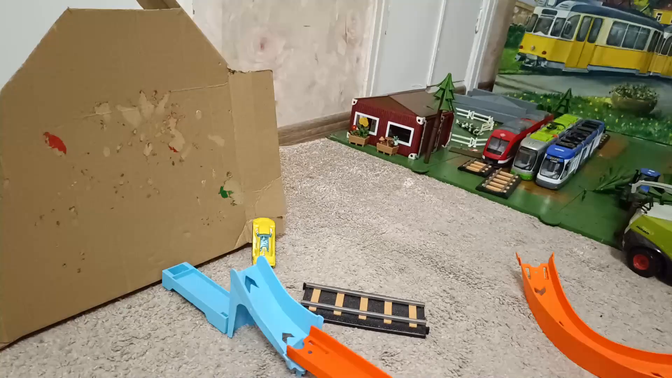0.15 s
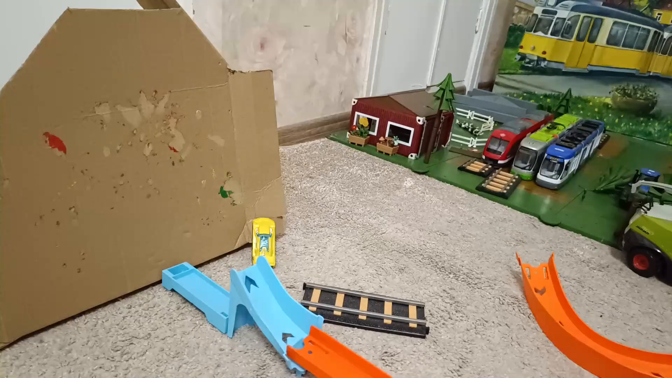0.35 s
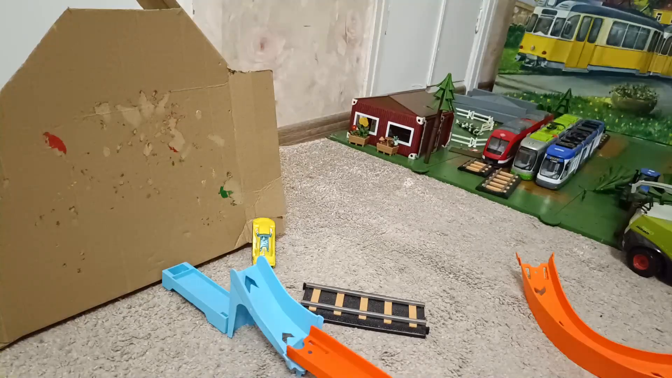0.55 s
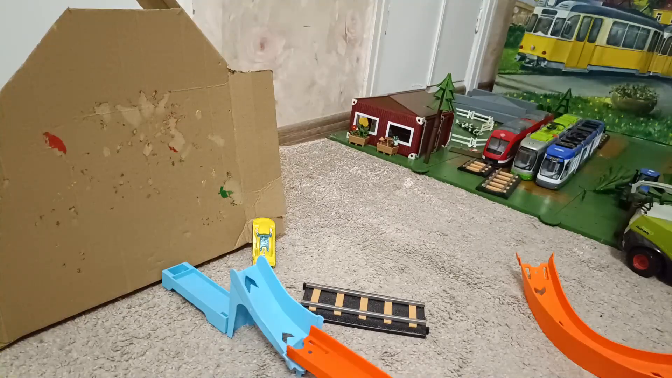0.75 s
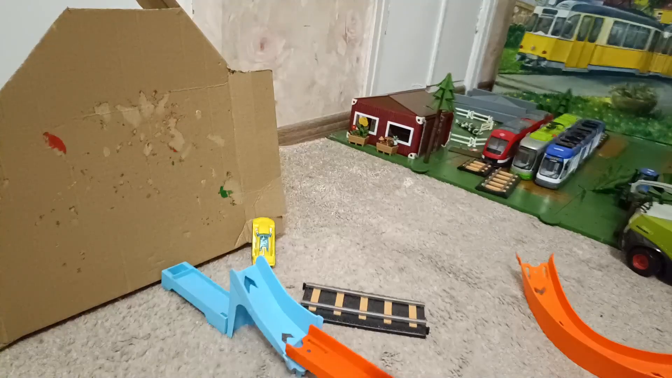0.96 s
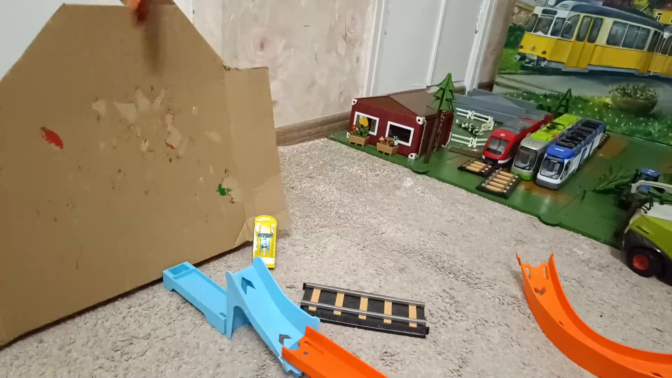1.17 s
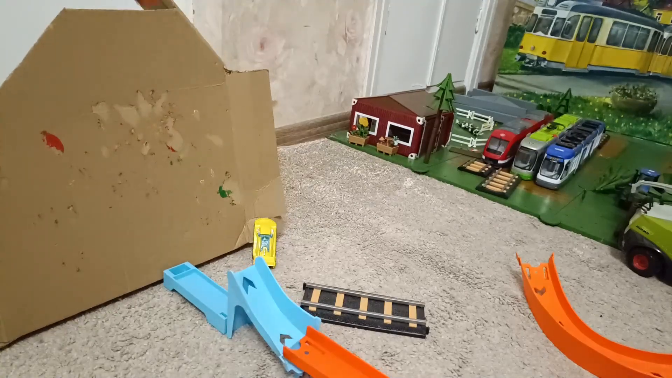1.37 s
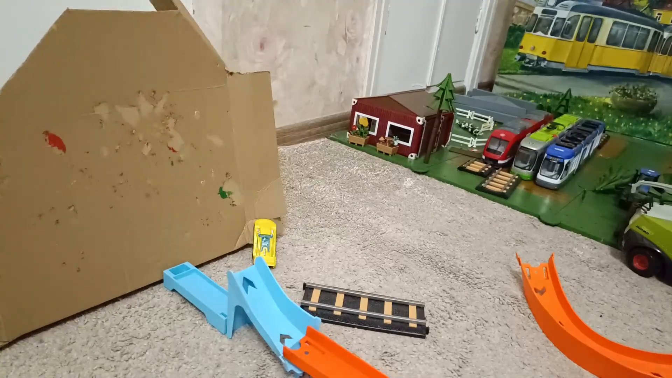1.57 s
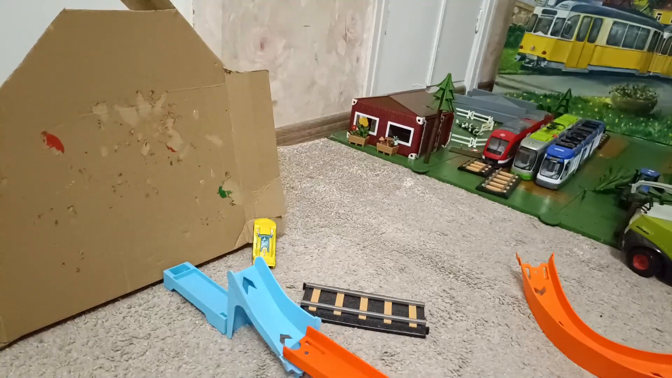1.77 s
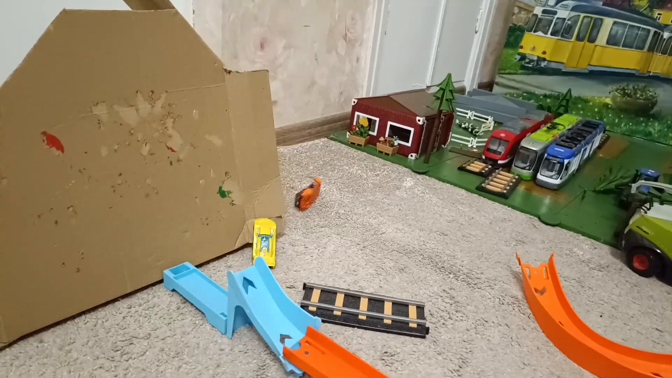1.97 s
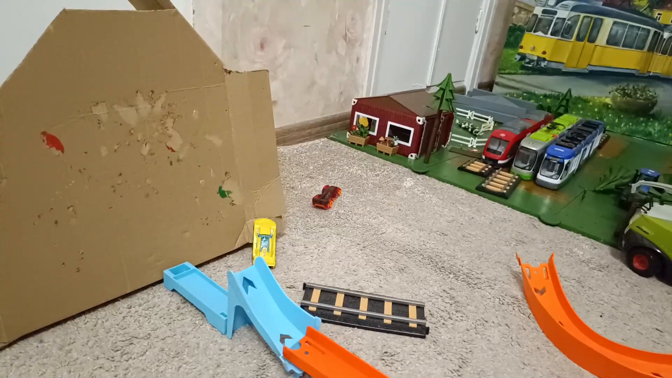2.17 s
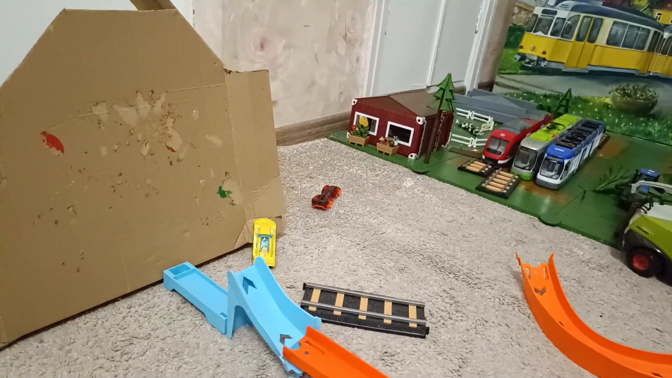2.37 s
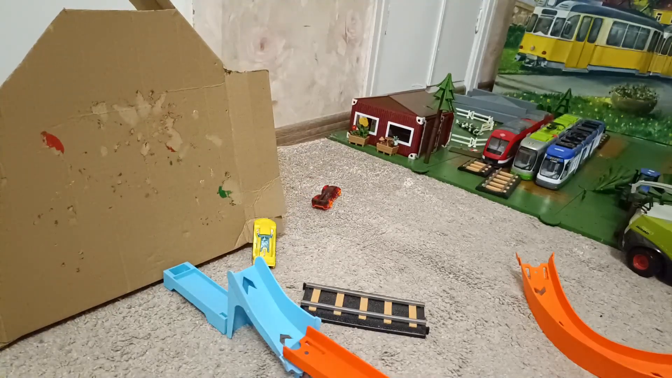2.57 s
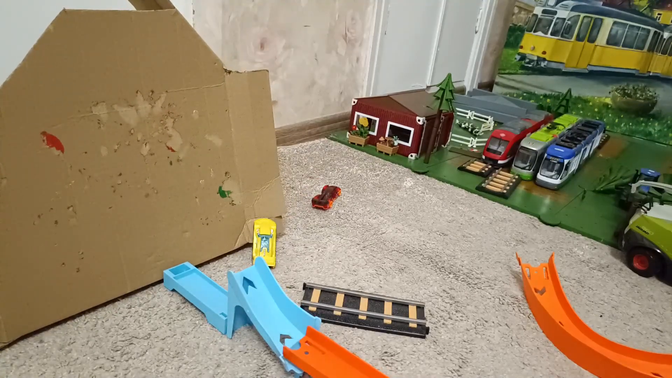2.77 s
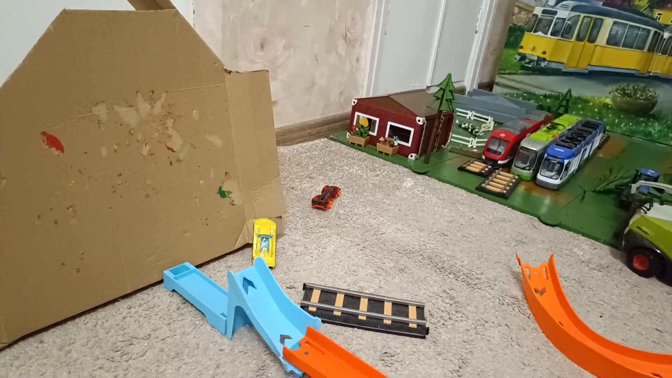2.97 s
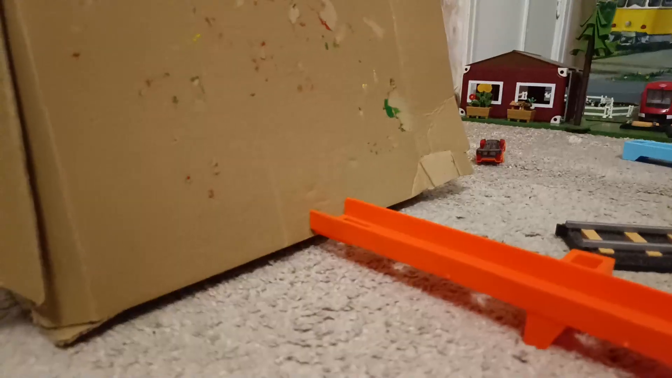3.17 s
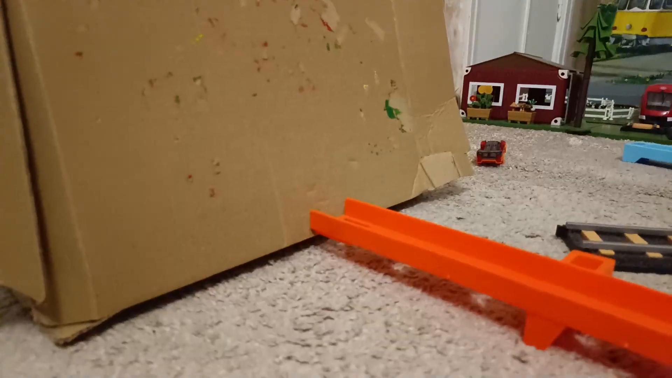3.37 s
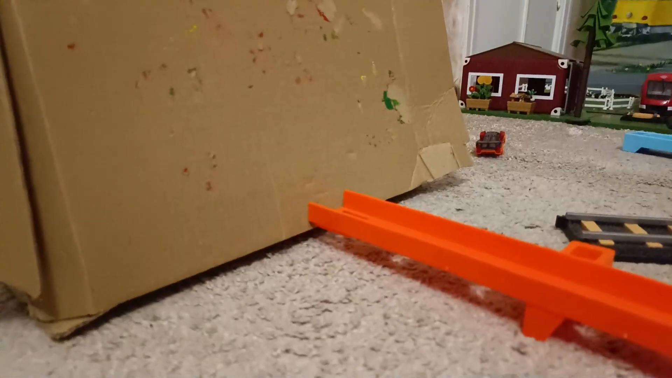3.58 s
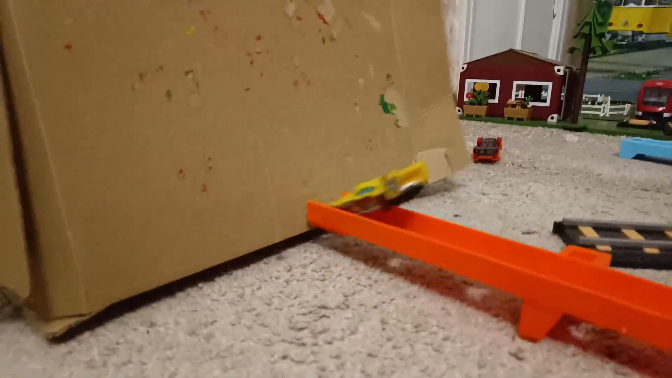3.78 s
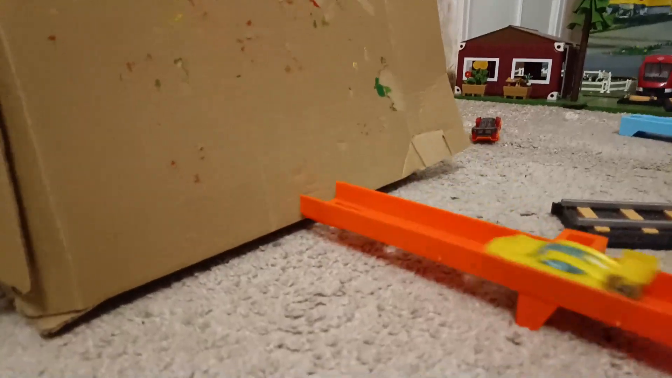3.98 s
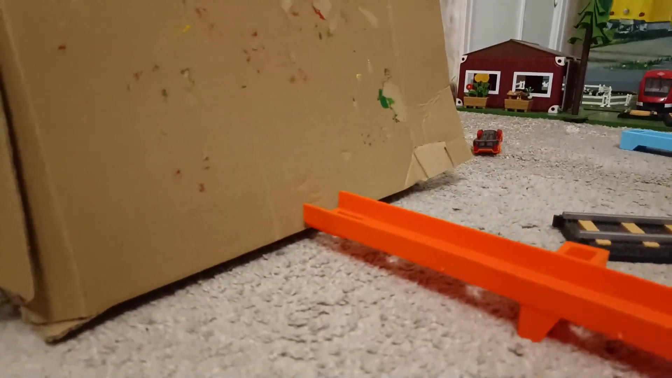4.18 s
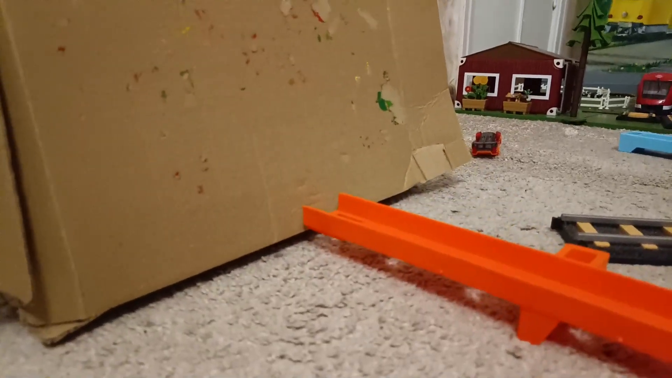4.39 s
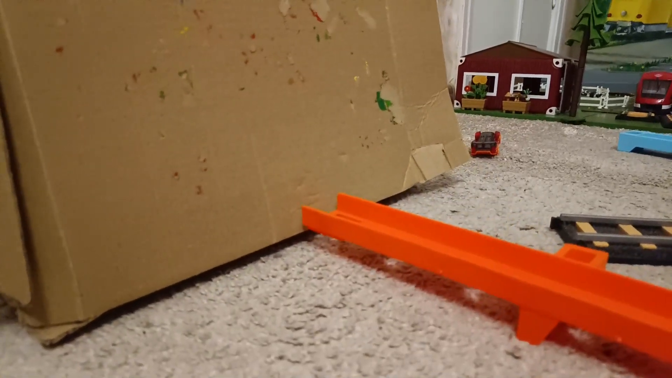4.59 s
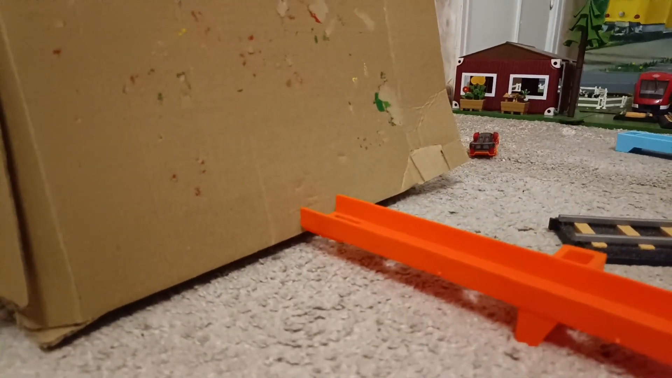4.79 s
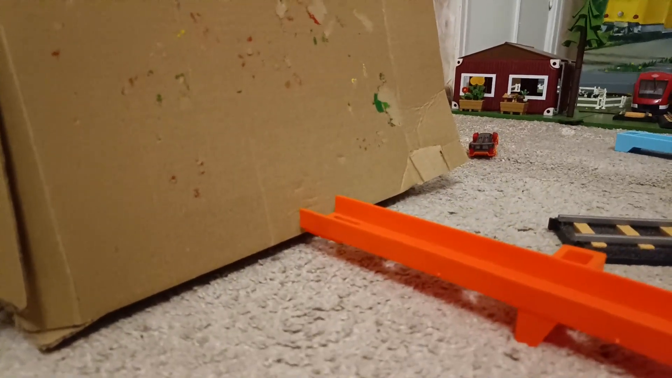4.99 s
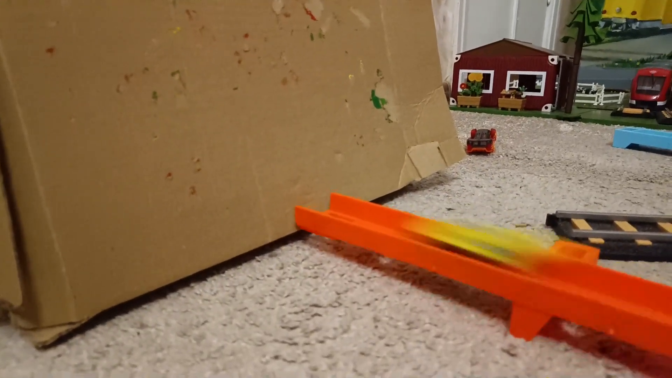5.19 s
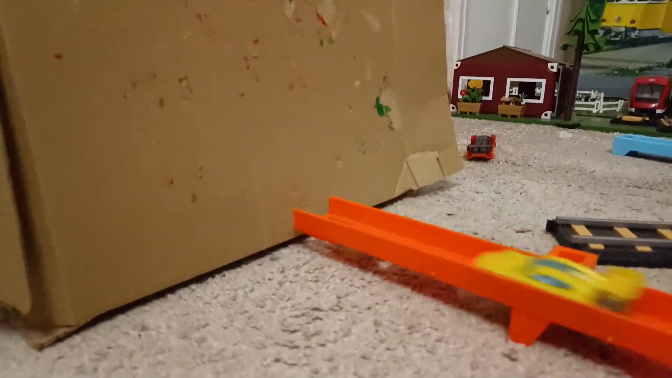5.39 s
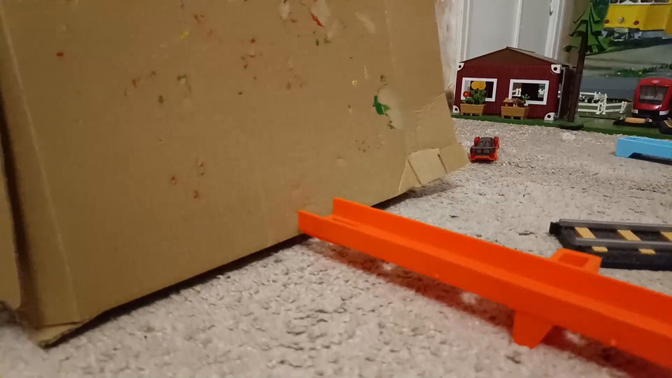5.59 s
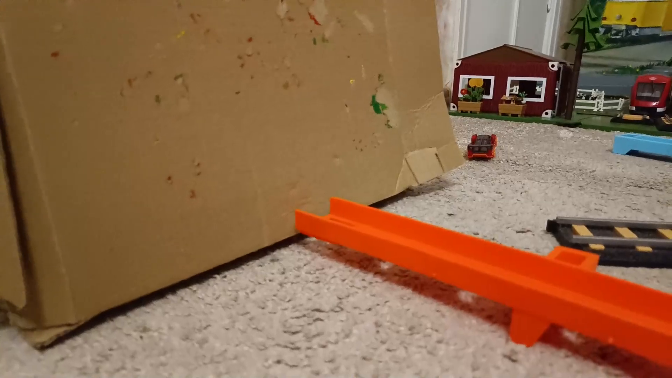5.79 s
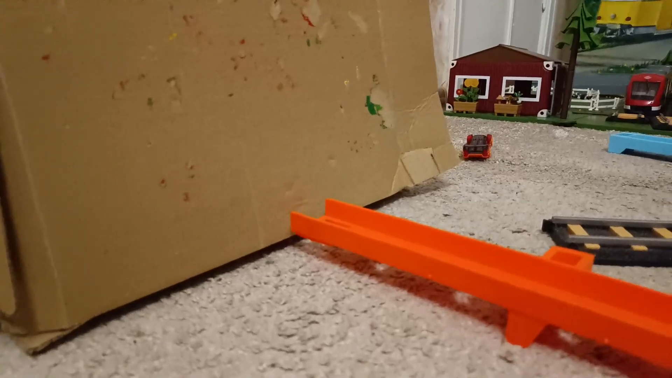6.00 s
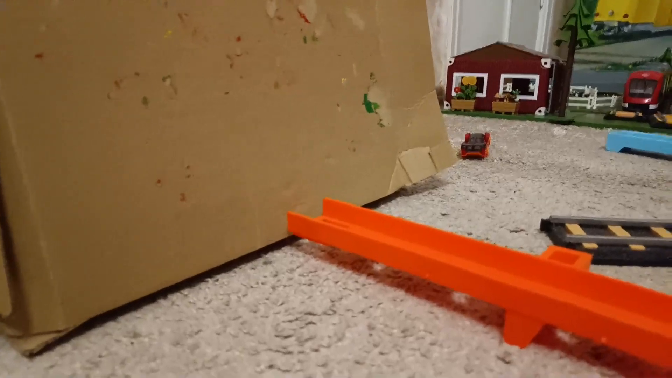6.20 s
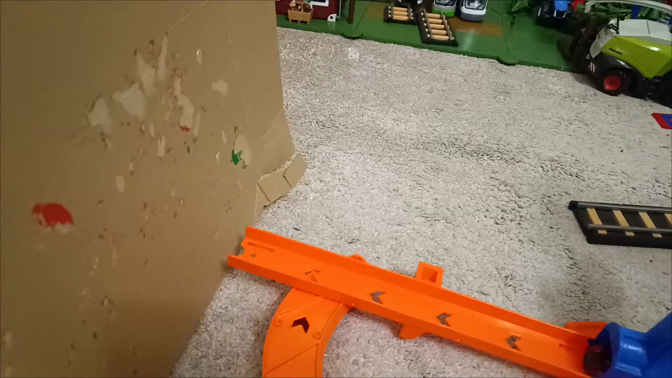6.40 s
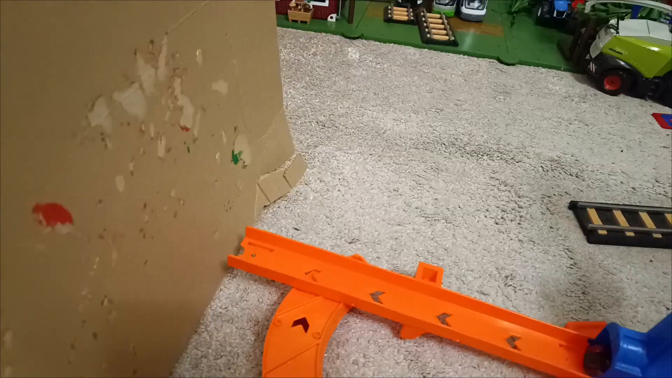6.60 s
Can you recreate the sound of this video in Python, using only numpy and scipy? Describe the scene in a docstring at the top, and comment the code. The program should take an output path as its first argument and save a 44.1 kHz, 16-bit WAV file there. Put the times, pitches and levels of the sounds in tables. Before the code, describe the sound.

Three toy metal cars shoot from a clacking plastic launcher, rattle along track and thump a cardboard box, wheels whirring in a quiet carpeted room.

```python
"""An appliance hums under room air and a thin whine; then a toy launcher clacks, close by on the right.
Three die-cast cars in turn clatter along a plastic track and thump a cardboard box in a carpeted room.
The first jumps off a ramp, tumbles and lands on the carpet, wheels spinning; the next two roll back.
Blows are bursts of noise bands that die away, the box panel adds sine modes, wheels are grainy noise,
and the hum and whine are drifting sines; two microphone channels hear it all with short reflections."""
import sys
import numpy as np
from scipy import signal
from scipy.io import wavfile

SR = 44100
rng = np.random.default_rng(int(sys.argv[2]) if len(sys.argv) > 2 else 0)


def master_out(mix):
    """Clip the mix to full scale and print it as 16-bit PCM to the path in sys.argv[1]."""
    frames = np.transpose(np.atleast_2d(mix))
    ceiling = np.clip(frames, -1, 1)
    pcm = np.round(ceiling * 32767).astype(np.int16)
    wavfile.write(sys.argv[1], SR, pcm)


N = 293265
TIME = np.arange(N) / SR   # s
EDGES = np.geomspace(35, 17500, 28)   # third-octave band edges, Hz
CENTRES = np.sqrt(EDGES[1:] * EDGES[:-1])   # Hz

# the plunger slams into its stop and rebounds: (t/s, rebound gap/s, level/dB,
# brightness/dB per octave, brightening per rebound/dB per octave)
SHOTS = [(0.8147, 0.0066, -8, -4.5, 5), (3.5213, 0.0091, -8, -1, 1.5), (5.0011, .0073, -9, 0.5, 1)]
# even-speed rolls, place 0 at the box and 1 at the launcher:
# (start t/s, end t/s, level at the box/dB, from place, to place)
ROLLS = [(0.848, 0.969, -41, 0.88, 0.099), (3.539, 3.606, -54, 0.81, 0.043), (3.76, 4.12, -57.5, 0.078, .9),
         (4.128, 4.238, -53.5, .9, 0.92), (5.021, 5.079, -49.5, 1, 0.035), (5.17, 5.434, -57.5, 0, 0.98),
         (5.563, 5.62, -52, 0.73, 0.44), (5.698, 5.768, -74.5, 1, 0.46)]


def from_db(db):
    """Decibels to gain."""
    return 10 ** (np.asarray(db) / 20)


def unit_energy(x):
    """Scale each row to energy 1."""
    return x / np.sqrt(np.sum(x ** 2, axis=-1, keepdims=True) + 1e-20)


def per_band(points):
    """Read a table over frequency at the band centres."""
    hz, value = np.transpose(points)
    return np.interp(np.log(CENTRES), np.log(hz), value)


def band_gains(colour, tilt_db=0):
    """Share a unit of energy among the bands; the tilt pivots at 1 kHz."""
    density_db = per_band(colour) + tilt_db * np.log2(CENTRES / 1000)
    return unit_energy(from_db(density_db) * np.sqrt(np.diff(EDGES)))


def noise_bands(size):
    """Third-octave stereo noise, channel x band x sample; likeness sets the mix of mid and side."""
    # likeness of diffuse sound at the two microphones: (f/Hz, correlation)
    likeness = [(50, 0.24), (250, 0.77), (500, 0.81), (1000, -0.39), (2000, -0.061), (16000, -0.36)]
    white = rng.standard_normal((2, 2, size + SR // 4))   # the extra start lets the filters settle
    bands = []
    for k, alike in enumerate(np.clip(per_band(likeness), -1, 1)):
        band_pass = signal.butter(2, EDGES[k:k + 2], "band", fs=SR, output="sos")
        mid, side = signal.sosfilt(band_pass, white[k % 2])[:, -size:]
        bands.append(np.sqrt(1 + alike) * mid + np.sqrt(1 - alike) * side * [[1], [-1]])
    return np.stack(bands, axis=1)


def dying(t60, size):
    """One exponential decay a band, down 60 dB after t60 seconds."""
    return np.exp(-np.log(1000) * TIME[:size] / np.maximum(t60, 1e-3)[:, None])


def add(out, sound, s, delay_ms, pan_db):
    """Lay a sound in at time s; it reaches the left microphone later by delay_ms and louder by pan_db."""
    for channel, side in enumerate((.5, -.5)):
        at = round((s + side * delay_ms / 1000) * SR)
        out[channel, at:at + sound.shape[-1]] += from_db(side * pan_db) * sound[channel]


def resonate(x, peaks):
    """Lift a narrow band around each resonance."""
    for hz, width_hz, lift_db in peaks:
        peak = signal.lfilter(*signal.iirpeak(hz, hz / width_hz, fs=SR), x)
        x = x + (from_db(lift_db) - 1) * peak
    return x


def knocks(rows, colour, t60, shortening, scatter, chatter_db, chatter_t60):
    """Noise bands stand for crowded modes, high ones dying first; loose parts chatter, faces scatter."""
    out, size = np.zeros((2, N)), SR // 10
    bank = noise_bands(size=SR)
    decay = dying(t60 * (CENTRES / 1000) ** -shortening, size)   # t60 holds at 1 kHz
    treble = CENTRES / (CENTRES + 1000)   # small things answer short waves only
    chatter = from_db(chatter_db) * treble[:, None] * dying(np.array([chatter_t60]), size)
    for s, level_db, tilt_db, delay_ms, pan_db in rows:
        a, b = rng.integers(0, SR - size, 2)
        jolt_sizes = np.minimum(rng.exponential(1, size=50), 2)
        jolts = np.interp(TIME[:size], np.linspace(0, TIME[size], 50), jolt_sizes)
        envelope = decay + chatter * jolts
        gains = band_gains(colour, tilt_db)
        direct = gains @ unit_energy(bank[0, :, a:a + size] * envelope)
        scattered = (gains * scatter * treble) @ unit_energy(bank[:, :, b:b + size] * envelope)
        blow = unit_energy(direct + scattered) * np.sqrt(.005 * SR)   # the energy of 5 ms at level 1
        add(out, from_db(level_db) * blow, s, delay_ms, pan_db)
    return out


def rebounding(rows, gap_s, loss_db):
    """One end of the struck thing touches first, the other a moment later and softer."""
    return [(s + k * gap_s, db - k * loss_db, tilt) for s, db, tilt in rows for k in (0, 1)]


def background(bands, waver_hz=4, waver=0.13):
    """Soft room air, an appliance hum wavering in level and phase, and a thin whine drifting in phase."""
    # the background as the microphone is carried about: (t/s, air level/dB, whine level/dB)
    levels = [(0, -62.5, -73.5), (.8, -57.5, -71.5), (2.2, -62.5, -76), (3.38, -62.5, -77),
              (3.499, -62, -84), (5.949, -62, -84.5)]
    # room air: (f/Hz, level/dB per Hz)
    air_colour = [(30, -12.5), (60, -16), (120, -0.5), (200, -0.5), (290, 4.5), (400, -8), (800, -11),
                  (2000, -13), (4000, -20.5), (7300, -29), (9000, -31), (11000, -26.5), (16000, -27.5)]
    hum_hz, hum_db, whine_hz = 264, -69, 1916
    s, air_db, whine_db = np.transpose(levels)
    air_noise = np.roll(band_gains(air_colour) @ bands, N // 2, axis=1)   # apart from the other noises
    air = from_db(np.interp(TIME, s, air_db)) * air_noise
    low_pass = signal.butter(2, waver_hz, fs=SR, output="sos")
    slow = signal.sosfilt(low_pass, rng.standard_normal((3, N)))
    swell, hum_drift, whine_drift = waver * unit_energy(slow) * np.sqrt(N)
    hum = from_db(hum_db) * (1 + swell) * np.sin(2 * np.pi * hum_hz * TIME + hum_drift)
    whine_gain = from_db(np.interp(TIME, s, whine_db))
    whine = whine_gain * np.sin(2 * np.pi * whine_hz * TIME + whine_drift)
    return air + np.sqrt(2) * (hum + whine)   # sine levels are RMS


def handling(bands):
    """Brief soft swells of rubbing noise."""
    # faint handling rustles between the shots: (t/s, level/dB, length/s)
    rustles = [(0.177, -61.5, 0.024), (2.821, -57.5, 0.023), (3.385, -58.5, 0.058), (4.367, -67, 0.053),
               (4.632, -56.5, 0.031)]
    # colour of the rubbing: (f/Hz, level/dB per Hz)
    rub_colour = [(200, 0), (1200, -7), (2500, -4), (4800, -8.5), (7000, -20), (16000, -25)]
    swells = sum(from_db(level_db) * np.exp(-2 * ((TIME - s) / length) ** 2)
                 for s, level_db, length in rustles)
    return swells * (band_gains(rub_colour) @ bands)


def shot_blows(count=3):
    """The catch ticks, then the plunger strikes its stop, weaker and brighter, the spring rattling between."""
    latch_lead_s, latch_db, latch_tilt_db = 0.0035, -14, 1   # the catch lets go just before the slam
    spring_db, spring_tilt_db = -11.5, 4.5   # the spring rattles between the rebounds
    loss_db = 3.5   # lost on each rebound
    rows = []
    for s, gap, db, tilt, brightening in SHOTS:
        rows.append((s - latch_lead_s, db + latch_db, latch_tilt_db))
        rows += [(s + k * gap, db - k * loss_db, tilt + k * brightening) for k in range(count)]
        rows += [(s + (k + .5) * gap, db + spring_db - k * loss_db, spring_tilt_db)
                 for k in range(count - 1)]
    return rows


def car_place():
    """Where the car is, 0 at the box and 1 at the launcher; each roll's end place holds until the next."""
    place = np.ones(N)
    for start, end, level_db, origin, goal in ROLLS:
        place = np.where(TIME < start, place, np.interp(TIME, [start, end], [origin, goal]))
    return np.clip(place, 0, 1)


def car_delay_ms():
    """The left-microphone delay follows the car along the track."""
    box_ms, launcher_ms = -0.26, .43
    return box_ms + (launcher_ms - box_ms) * car_place()


def gate(start, end):
    """Wheel sound builds up exponentially, holds, and runs out."""
    attack_s, release_s = 0.0087, 0.037
    attack = -np.expm1(-np.maximum(TIME - start, 0) / attack_s)
    return attack * np.exp(-np.maximum(TIME - end, 0) / release_s)


def rolling_gain():
    """Each roll has its own level, and is louder the nearer the car is to the microphones."""
    near_db = 7.5   # louder at the launcher, which is close to the microphones
    rolls = sum(from_db(level_db) * gate(start, end) for start, end, level_db, *places in ROLLS)
    return from_db(near_db * car_place()) * rolls


def wall_taps(count=36, above_db=-1, spread_db=3, tilt_db=0.5):
    """The rolling car brushes the track's walls at random moments, about as hard as it rolls."""
    moving = np.flatnonzero(sum((TIME > start) & (TIME < end) for start, end, *rest in ROLLS))
    fraction = (np.arange(count) + rng.random(count)) / count   # one random moment in each equal share
    at = moving[(fraction * (len(moving) - 1)).astype(int)]
    rolling_db = 20 * np.log10(rolling_gain()[at] + 1e-9)
    levels = rolling_db + above_db + spread_db * rng.standard_normal(count)
    return [(s, db, tilt_db, delay, 0) for s, db, delay in zip(TIME[at], levels, car_delay_ms()[at])]


def launcher(pan_db=0.2):
    """Hard plastic clacks, close by on the right, and light taps along the track."""
    # knocks on the plastic of launcher and track, mostly from the returning car:
    # (t/s, level/dB, brightness/dB per octave)
    track_knocks = [(4.050, -39, -2), (4.064, -37.5, -0.5), (4.0957, -36, 1.5), (4.148, -36.5, -3),
                    (4.1736, -19, -.5), (4.2, -26.5, -1.5), (4.217, -30, 4), (4.7076, -38.5, -7.5),
                    (5.1164, -22.5, -.5), (5.4372, -24, 0), (5.586, -37, -4), (5.5979, -36, -2),
                    (5.6215, -22.5, -1), (5.648, -40.5, -5.5), (5.7518, -45, 0.5)]
    # colour of the struck plastic: (f/Hz, level/dB per Hz)
    plastic = [(50, -32), (150, -21), (350, -9), (600, 6), (1100, 5.5), (1700, -2.5), (2400, 1),
               (3500, -2.5), (5000, -11.5), (7000, -16.5), (9000, -15), (12000, -25.5), (16000, -30.5)]
    delay_ms = .43   # later at the left microphone
    blows = shot_blows() + rebounding(track_knocks, gap_s=.0033, loss_db=8)
    rows = [(*row, delay_ms, pan_db) for row in blows] + wall_taps()
    return knocks(rows, plastic, t60=.02, shortening=.3, scatter=1.0, chatter_db=-24.5, chatter_t60=0.23)


def carpet():
    """Cushioned thuds and the launcher's recoil set the floor ringing."""
    # soft thuds as the car lands or the track is jolted: (t/s, level/dB, brightness/dB per octave)
    thuds = [(0.908, -32, -2), (1.7468, -30.5, -8.5), (1.760, -24, -5), (1.776, -36.5, -3.5),
             (3.764, -44, 5), (3.78, -37.5, 6.5), (3.827, -43.5, 3), (5.376, -37.5, 1.5), (5.718, -42.5, 3)]
    # colour through the carpet: (f/Hz, level/dB per Hz)
    carpet_colour = [(50, -60), (100, -27.5), (150, -6.5), (220, -5.5), (450, -6.5), (800, -16.5),
                     (2000, -34), (16000, -60.5)]
    # floor resonance: (f/Hz, width/Hz, lift/dB)
    floor_peaks = [(140, 15, 7.9)]
    recoil_db, recoil_tilt_db = -13, 0.5   # the slam jolts the floor
    recoils = [(s, db + recoil_db, recoil_tilt_db) for s, gap, db, *colour in SHOTS]
    rows = [(*row, -.07, -.5) for row in thuds + recoils]
    soft = knocks(rows, carpet_colour, t60=0.056, shortening=0.51, scatter=0.55,
                  chatter_db=-26.5, chatter_t60=.1)
    return resonate(soft, floor_peaks)


def grainy(bands, colour, per_s, grain_s, grit, wander_db):
    """Tiny contacts follow each other at random; the colour shifts from spot to spot."""
    contacts = (rng.random(N) < per_s / SR) * np.minimum(rng.exponential(1, N), 3)
    power = signal.lfilter([1], [1, -np.exp(-1 / (grain_s * SR))], contacts + 1e-18)
    share = np.clip(grit, 0, 1)   # share of the power that comes in grains
    spots = from_db(wander_db * rng.standard_normal(size=(len(CENTRES), 160)))
    spot_s = np.linspace(0, TIME[-1], spots.shape[1])
    hiss = sum(np.interp(TIME, spot_s, gain * spots[k]) * bands[:, k]
               for k, gain in enumerate(band_gains(colour)))
    return hiss * np.sqrt(1 - share + share * power / power.mean())


def from_car(x, diffuse=1.0):
    """Direct sound moves with the car from ear to ear; the rest is scattered by the track and the box."""
    direct = np.roll(x[0], N // 3)   # apart from the scattered noise
    delay_s = car_delay_ms() / 1000
    heard = [np.interp(TIME - side * delay_s, TIME, direct) for side in (.5, -.5)]
    return np.array(heard) + diffuse * x


def spinning_gain():
    """Free wheels fade at a steady rate after each jolt, for a set length."""
    # a jolt sets the wheels spinning freely: (t/s, length/s, level/dB)
    spins = [(1.071, 0.32, -51.5), (1.253, 0.23, -50.5), (1.497, 0.25, -52.5), (1.75, 0.09, -46),
             (1.927, .1, -47.5), (3.654, 0.21, -46), (5.1, 0.2, -49)]
    fade_db_per_s = 70
    return sum(from_db(level_db - fade_db_per_s * np.maximum(TIME - s, 0)) * gate(s, s + length)
               for s, length, level_db in spins)


def wheels(bands):
    """Wheels rattle along the track and whirr on their loose axles in the air."""
    # colours on the track and spinning freely: (f/Hz, level/dB per Hz)
    roll_colour = [(50, -12.5), (130, -6.5), (400, -5), (800, -0.5), (1400, -6.5), (2900, -1), (4400, -5.5),
                   (6000, -4), (9000, -9.5), (12000, -19.5), (16000, -30)]
    spin_colour = [(100, -24), (2000, -10.5), (3500, -4), (4700, -6.5), (6200, -6.5), (9300, -12),
                   (12000, -13.5), (16000, -18)]
    # resonances stirred on the track and spinning freely: (f/Hz, width/Hz, lift/dB)
    roll_peaks = [(760, 240, 2.5), (2620, 840, 7), (5940, 690, 5.5)]
    spin_peaks = [(2900, 300, 3.2), (3633, 330, 8), (9240, 1200, 9)]
    rolling = grainy(bands, roll_colour, per_s=700, grain_s=.001, grit=.65, wander_db=2.5)
    rolling = from_car(resonate(rolling, roll_peaks))
    spinning = grainy(bands, spin_colour, per_s=380, grain_s=.002, grit=0.36, wander_db=2.5)
    spinning = resonate(spinning, spin_peaks)
    rolling, spinning = unit_energy(np.array([rolling, spinning])) * np.sqrt(N)   # RMS 1
    return rolling_gain() * rolling + spinning_gain() * spinning


def car(shadow_db_per_ms=4):
    """Small bright clicks of metal and wheels, louder on the side that they reach first."""
    # the metal body clicking on track, box or floor: (t/s, level/dB, brightness/dB per octave)
    clicks = [(.8938, -22.5, -2), (.908, -19, -1.5), (.923, -33, 2.5), (1.1095, -38.5, -8.5),
              (1.629, -46, 1), (1.747, -39.5, 14.5), (1.759, -37, 0.5), (1.776, -36, 7.5), (1.876, -48, 0),
              (1.9432, -45, 2), (1.963, -45, 4), (3.603, -38, 0), (3.7393, -35.5, 1.5),
              (3.7616, -29.5, 0.5), (3.7796, -32, -0.5), (3.8244, -37.5, 3.5), (4.0805, -42, -1.5),
              (5.1465, -41, 3), (5.157, -33.5, 0), (5.208, -37, 2.5)]
    # colour of the struck metal: (f/Hz, level/dB per Hz)
    metal = [(100, -22.5), (600, -16), (1500, -11), (2700, 4), (4500, -8.5), (6300, -0.5), (7500, -7.5),
             (9500, -4), (12000, -11.5), (16000, -19)]
    # ringing of the car's shell and axles: (f/Hz, width/Hz, lift/dB)
    shell_peaks = [(2700, 80, 8), (3824, 130, 6), (5960, 550, 3)]
    touches = rebounding(clicks, gap_s=0.0045, loss_db=11.5)
    delays = np.interp([row[0] for row in touches], TIME, car_delay_ms())
    rows = [(*row, delay, -shadow_db_per_ms * delay) for row, delay in zip(touches, delays)]
    bright = knocks(rows, metal, t60=0.014, shortening=0.096, scatter=1.6, chatter_db=-20, chatter_t60=0.15)
    return resonate(bright, shell_peaks)


def box(contact_s=0.00172, thump_s=.011, ring_db=-9):
    """A dull crack where the car lands; the panel gives a short thump, then rings on softly."""
    # the car crashing into the cardboard face: (t/s, crack level/dB, brightness/dB per octave,
    # panel boom level/dB, left-microphone delay/ms, left-right level/dB)
    hits = [(0.9693, -21, 3, -13.5, -0.34, -3), (.9730, -20, 2, -50.5, -.3, 8.5),
            (.980, -13.5, -0.5, -6, -.3, -2), (1.109, -30.5, 2, -41, 0.33, 2),
            (3.6188, -20, 1, -13.5, -0.13, 10), (3.6223, -15.5, -3, -14.5, -0.22, -2),
            (5.0784, -17.5, 0.5, -9.5, -0.24, 0.5), (5.082, -12, -2, -28, -0.27, -5)]
    # cardboard panel modes: (f/Hz, level/dB, t60/s)
    modes = [(150.3, -25.5, .17), (185.2, -8.5, 0.12), (209.5, -8, 0.13), (251, -14, 0.14),
             (295, -7.5, 0.16), (310, -14.5, .1), (410, -11, 0.056), (506.4, -16.5, .05), (705, -9, 0.076)]
    # colour of the crack: (f/Hz, level/dB per Hz)
    cardboard = [(50, -46), (150, -11), (350, 1.5), (540, 4), (800, -0.5), (1300, -1.5), (2500, -9.5),
                 (4000, -21.5), (7000, -29), (9000, -31.5), (12000, -36), (16000, -42.5)]
    cracks = [(s, db, tilt, delay, pan) for s, db, tilt, boom, delay, pan in hits]
    out = knocks(cracks, cardboard, t60=0.018, shortening=0.18, scatter=1.0,
                 chatter_db=-16.5, chatter_t60=0.21)
    hz, mode_db, t60 = np.transpose(modes)
    size = SR // 4
    # large swings lose energy quickly in the flutes
    crush = np.exp(-TIME[:size] / thump_s) + from_db(ring_db)
    swing = -np.expm1(-TIME[:size] / contact_s) * crush * dying(t60, size)
    for s, crack_db, tilt_db, boom_db, delay_ms, pan_db in hits:
        # each spot drives the modes differently, and the limp panel never rings twice alike
        strength = from_db(boom_db + mode_db + rng.normal(0, 2.3, len(hz)))
        pitch = hz[:, None] * (1 + rng.normal(0, 0.018, (len(hz), 1)))
        boom = strength @ (swing * np.sin(2 * np.pi * pitch * TIME[:size]))
        add(out, np.array([boom, boom]), s, delay_ms, pan_db)
    return out


def tumble():
    """Hollow knocks as the falling car strikes the resonant back of the box."""
    # the car tumbling over the back of the box: (t/s, level/dB, brightness/dB per octave)
    tumbles = [(1.194, -46, -2), (1.2637, -32.5, 0.5), (1.272, -30, -3), (1.391, -45, -7),
               (1.433, -44.5, -8), (1.455, -48, 0), (1.475, -9, -1.5), (1.487, -16.5, -2),
               (1.5104, -19, -1.5), (1.530, -24, -5.5), (1.629, -32.5, -3.5)]
    # colour of the back of the box: (f/Hz, level/dB per Hz)
    back_colour = [(50, -34.5), (130, -15), (230, -7.5), (400, -2), (540, 0), (750, -2.5), (1100, -3),
                   (1500, -14), (2500, -18.5), (4000, -25), (7000, -32.5), (12000, -37.5), (16000, -46)]
    # its resonances: (f/Hz, width/Hz, lift/dB)
    back_peaks = [(154.7, 19, 16.5), (513, 130, 4.5), (1850, 210, 7.5)]
    rows = [(*row, -.3, -2.5) for row in tumbles]
    hollow = knocks(rows, back_colour, t60=0.0301, shortening=.15, scatter=0.69,
                    chatter_db=-6.5, chatter_t60=0.22)
    return resonate(hollow, back_peaks)


def room(dry, build_s=0.00083):
    """Reflections of the left channel build up within milliseconds and die away band by band."""
    # reverberation time, held to 1 ms at least: (f/Hz, t60/s)
    room_t60 = [(100, 0.63), (300, 0.24), (1000, 0.31), (3000, 0.05), (5000, 0.0952), (16000, -0.06)]
    # reverberation level: (f/Hz, level/dB)
    room_db = [(100, -13), (300, -10), (700, -12.5), (2000, -8.5), (4000, -5), (8000, -1.5), (16000, -9.5)]
    size = SR // 2
    build_up = -np.expm1(-TIME[:size] / build_s)
    tails = noise_bands(size=size) * dying(per_band(room_t60), size) * build_up
    gains = from_db(per_band(room_db)) * np.sqrt(2 * np.diff(EDGES) / SR)
    response = gains @ unit_energy(tails)
    return signal.fftconvolve(dry[:1], response, axes=1)[:, :N]


def scene(low_cut_hz=125):
    """Blows and wheels in the room; such light things radiate little deep bass."""
    bands = unit_energy(noise_bands(size=N)) * np.sqrt(N)
    blows = launcher() + carpet() + car() + box() + tumble()
    blows = signal.sosfilt(signal.butter(2, low_cut_hz, "high", fs=SR, output="sos"), blows)
    return background(bands) + handling(bands) + wheels(bands) + blows + room(blows)


def record(dry):
    """The microphone ports ring, peaks are rounded, the sound stops dead, the top is cut."""
    # resonance of the microphone ports: (f/Hz, width/Hz, lift/dB)
    port_peaks = [(8820, 800, 7.5)]
    ceiling, silent_from_s, cutoff_hz = .95, 5.983, 16000
    rounded = ceiling * np.tanh(resonate(dry, port_peaks) / ceiling)
    stopped = rounded * (TIME < silent_from_s)
    return signal.sosfilt(signal.ellip(10, .1, 80, cutoff_hz, fs=SR, output="sos"), stopped)


dry = scene()
out = record(dry)
master_out(out)
```